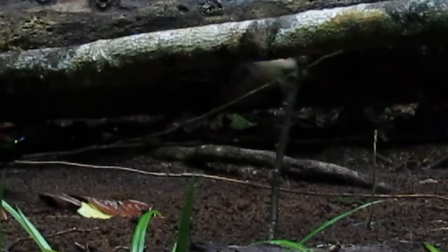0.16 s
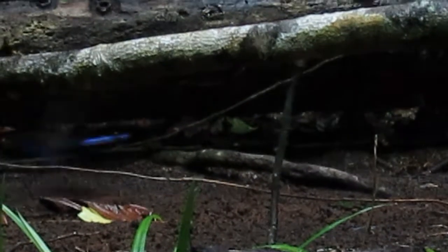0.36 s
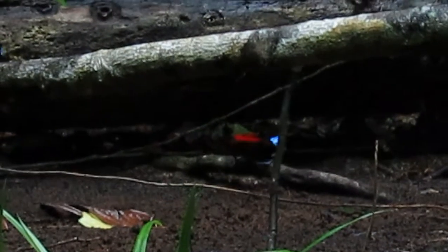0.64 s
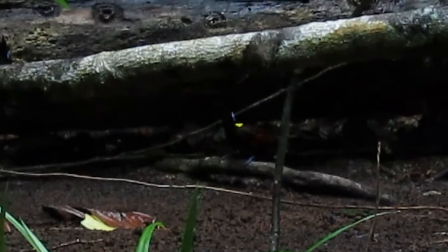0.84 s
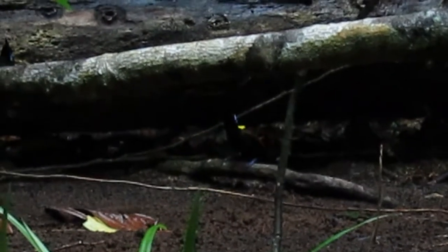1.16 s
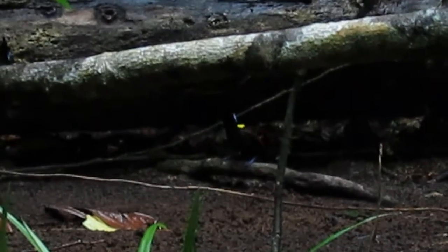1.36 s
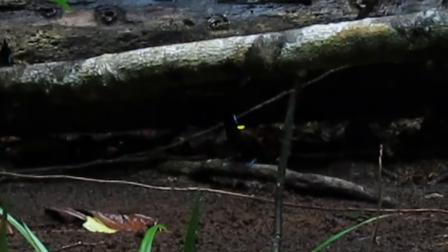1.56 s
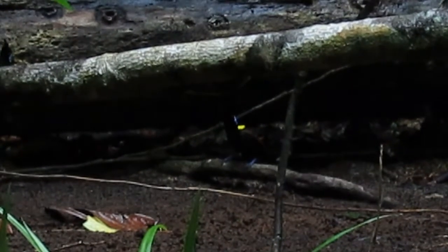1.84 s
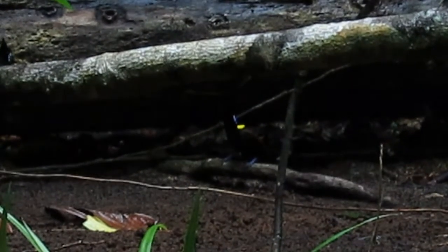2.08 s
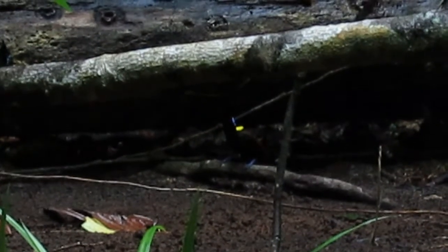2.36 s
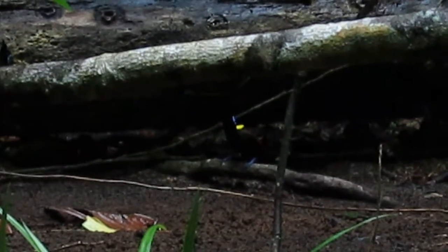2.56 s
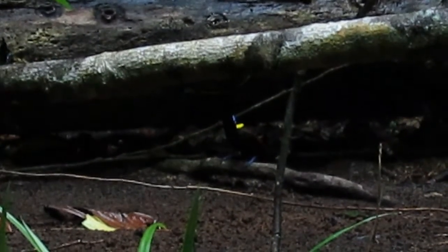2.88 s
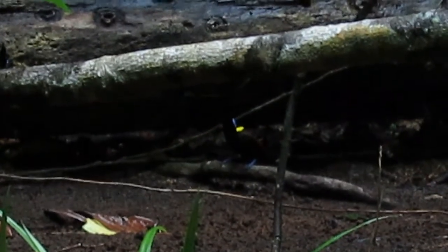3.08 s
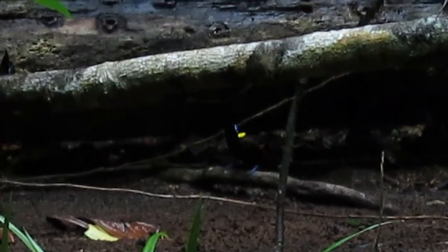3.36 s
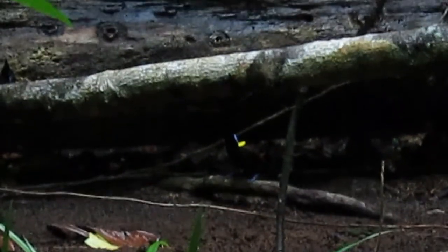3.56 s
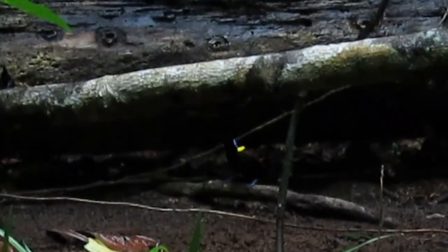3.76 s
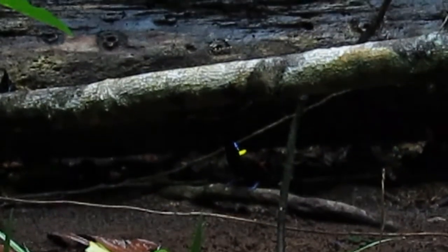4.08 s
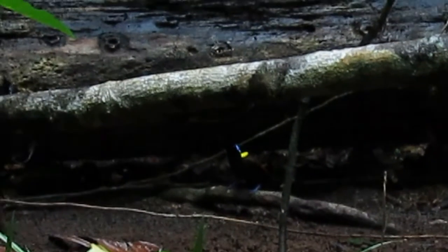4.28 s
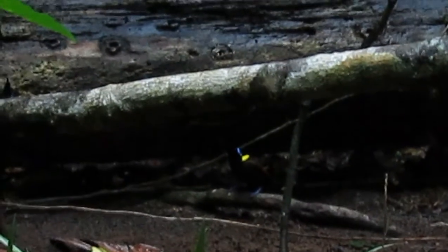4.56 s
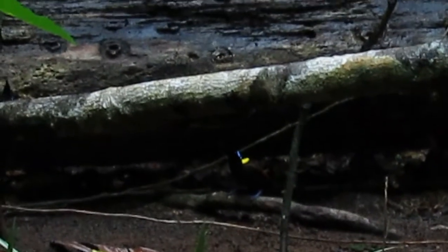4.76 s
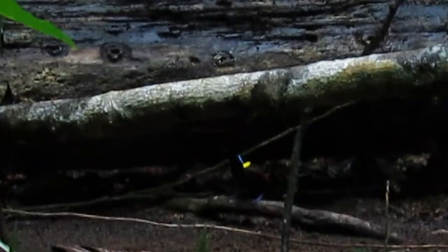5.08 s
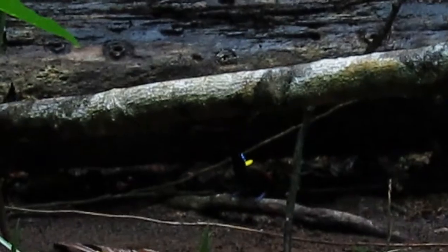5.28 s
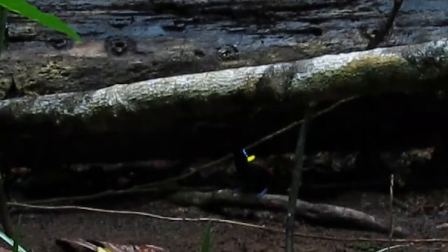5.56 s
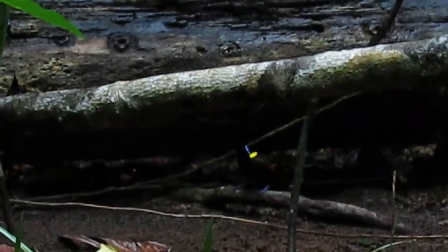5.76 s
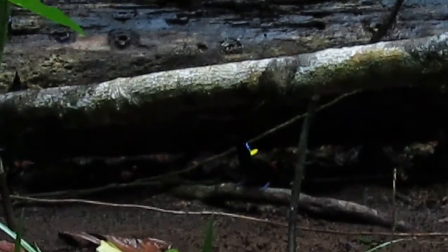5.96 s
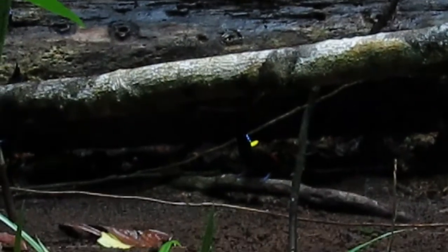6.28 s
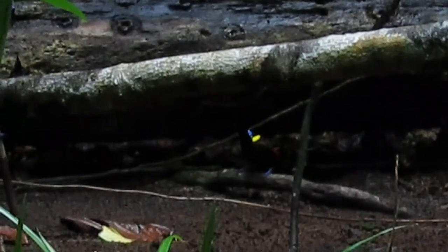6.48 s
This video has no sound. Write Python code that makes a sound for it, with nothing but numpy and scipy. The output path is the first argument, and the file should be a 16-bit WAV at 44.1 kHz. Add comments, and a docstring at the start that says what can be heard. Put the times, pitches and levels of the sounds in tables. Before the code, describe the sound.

A near cricket chirps high pure tones in uneven bursts over a steady insect chorus while a distant bird's falling whistles quicken into a trill.

```python
"""A near cricket chirps pure tones in uneven bursts on a rainforest floor, heard by a stereo pair of microphones.
A fainter cricket sings behind it, and a far insect chorus, made of shaped noise, fills the treble.
At middle distance a bird's gliding falling whistles quicken into a rising trill and a second, deeper bird
joins; slurs, whistles, pips and a hoarse call, all gliding tones, come from other birds.
A small bird lands with a rattle of filtered clicks; ticks and rustles of filtered noise lie over a wide air."""
import sys
import numpy as np
from scipy import signal
from scipy.fft import rfft, irfft
from scipy.io import wavfile
from scipy.ndimage import uniform_filter1d

SR = 44100
rng = np.random.default_rng(int(sys.argv[2]) if len(sys.argv) > 2 else 0)


def master(y):
    """Save y as 16-bit WAV."""
    cut = np.clip(np.atleast_2d(y).T, -1, 1)
    pcm = np.round(cut * 32767)  # scale
    wavfile.write(sys.argv[1], SR, pcm.astype(np.int16))


N = 292383
TIME = np.arange(N) / SR
BINS = np.fft.rfftfreq(N, 1 / SR)

# Levels in the tables are relative: a layer's trim_db and its small variations are added to them.
# still air of the forest: [f/Hz, level common to both sides/dB per Hz, level opposed between them/dB per Hz]
AIR_SPECTRUM = [(25.5, -100, -105), (60, -93, -73.5), (133.4, -90, -72), (296, -88.5, -75), (587, -91, -80),
                (1140, -91, -87), (1510, -91, -89), (2190, -100, -102), (3470, -101, -107),
                (6700, -104, -106), (11100, -107, -107), (13580, -113, -113), (15440, -120, -120)]
# the far insect chorus: [f/Hz, level/dB per Hz]
CHORUS_SPECTRUM = [(3600, -118), (4100, -101), (4400, -89), (4700, -83), (5000, -77.5), (5450, -79),
                   (5950, -84.5), (6250, -79.5), (6500, -91), (6800, -85.5), (7150, -85.5), (7450, -104),
                   (8200, -120)]
# swell of the chorus, followed in part by the air: [t/s, level/dB]
CHORUS_SWELL = [(0, 0.5), (.5, -1), (1.2, 1), (2, 0), (3.1, 1.2), (3.7, -0.2), (4.2, 1.5), (5, -0.8),
                (5.8, -1.5), (6.4, -1.5)]
# how long the trees ring: [f/Hz, time to fall by 60 dB/s]
TREE_RING = [(200, 0.27), (1500, 0.82), (3700, 1), (6300, 0.4), (13000, 0.078)]
# wing flutter, dull rustles and soft thumps: [t/s, length/s, centre f/Hz, level/dB]
SOFT_THUMPS = [(0.197, 0.43, 94, -54), (.345, 0.018, 170, -39), (3.204, 0.44, 744, -58.5),
               (3.278, 0.31, 285, -59), (6.215, 0.059, 288, -42.5)]
# ticks of leaves and twigs: [t/s, level/dB, brightness/dB, ring f/Hz, ring level/dB]
LITTER_TICKS = [(.352, -62, -9.5, 2070, 4), (.394, -66.5, 15, 7500, -5), (.437, -62, 9, 8900, 5),
                (.447, -54.5, 3, 7860, 2.5), (.606, -64, -4.5, 5400, 23.5), (0.927, -57, 5, 3420, 4),
                (1.276, -59, -15.5, 760, 13), (1.312, -55.5, -9, 3660, 6.5), (1.44, -57.5, -6, 3300, 5),
                (1.539, -58.5, -6, 800, 0), (1.552, -55.5, -5, 2030, 4), (1.805, -63, 8, 7500, 1),
                (1.916, -52.5, -5.5, 2700, -7), (2.752, -56, -4.5, 3500, 4), (2.78, -54, -2, 3180, 4),
                (3.374, -59.5, -14, 790, 5), (4.81, -57, -8.5, 3000, 4), (5.708, -61, -4, 1730, 15),
                (5.901, -54.5, -4, 8500, -2)]
# falling whistles of distant birds: [t/s, length/s, first f/Hz, level/dB]
FAR_WHISTLES = [(0, 0.28, 1543, -50.5), (.22, 0.4, 1362, -56.5), (0.956, .2, 1397, -54.5),
                (2.457, 0.092, 1480, -50.5), (2.892, 0.085, 1520, -47), (5.262, 0.12, 1575, -55),
                (5.372, 0.11, 1520, -61), (5.523, 0.12, 1557, -59), (5.718, 0.17, 1456, -61),
                (5.849, .38, 1382, -59), (6.293, 0.1, 1575, -58)]
# syllables of a hoarse far call: [t/s, length/s, first f/Hz, last f/Hz, level/dB]
HOARSE_CALL = [(2.97, 0.071, 2080, 2360, -61.5), (4.023, 0.18, 1956, 2380, -59.5),
               (4.056, 0.071, 2500, 3150, -60.5), (4.255, 0.11, 3310, 2376, -61),
               (4.326, 0.2, 2600, 2150, -62)]
# thin high pips: [t/s, first f/Hz, level/dB]
HIGH_PIPS = [(.597, 12400, -64), (2.475, 12600, -58), (4.06, 12100, -62), (5.81, 13300, -59),
             (5.915, 12700, -59), (6.151, 13900, -54)]
# short slurred calls of another bird: [t/s, length/s, first f/Hz, last f/Hz, level/dB]
NEAR_SLURS = [(.07, 0.077, 3450, 3950, -60), (2.825, .05, 3020, 2950, -57.5),
              (2.948, .045, 3540, 3800, -52.5), (3.364, .048, 3590, 3700, -51),
              (3.818, 0.056, 3380, 3830, -54), (3.866, 0.041, 3800, 3560, -56.5)]
# blurred calls from deep among the trees, short high slurs and a few low falling whistles:
# [t/s, length/s, first f/Hz, last f/Hz, level/dB]
DEEP_CALLS = [(0, 0.028, 3580, 3800, -58.5), (0, 0.068, 2955, 3530, -61), (.075, 0.048, 3420, 4060, -57),
              (2.99, 0.055, 3680, 4370, -53.5), (3.09, 0.073, 1400, 1186, -58), (3.64, .1, 1380, 1120, -57),
              (3.87, 0.05, 3620, 4400, -57), (4.33, 0.15, 2573, 2524, -66),
              (5.26, 0.101, 1650, 1398, -61.5)]
# the second bird's farther trill: [t/s, top f/Hz, level/dB]
ANSWER_COURSE = [(1.8, 1522, -51.5), (2.5, 1545, -68), (3.05, 1642, -60.5), (3.8, 1843, -55.5),
                 (4.55, 1863, -56.5), (4.9, 1768, -89)]
# course of the first bird's song; linger above 1 holds each note high longer:
# [t/s, top f/Hz, bottom f/Hz, level/dB, linger (exponent), scatter level/dB]
SONG_COURSE = [(.74, 1682, 1392, -51.5, 0.86, -5), (1.01, 1671, 1420, -49.5, 0.78, -5.5),
               (1.3, 1725, 1405, -51, 0.7, -4), (1.5, 1798, 1421, -48.5, 0.82, -5.5),
               (2.1, 1851, 1426, -51, 1.21, -2.5), (2.55, 1970, 1390, -50, 1.27, -2),
               (3.05, 2002, 1407, -47, 1.29, -2), (3.6, 1971, 1428, -51, 1.295, -4),
               (3.8, 1967, 1464, -59.5, 1.25, -1.5)]
# twig rattle as the small bird lands: [t/s, level/dB]
LANDING_KNOCKS = [(0.9274, -25), (.9308, -28.5), (0.9331, -38.5), (0.934, -39), (0.9408, -33.5)]
# the second, fainter cricket: [t/s, level/dB]
FAR_CRICKET_CHIRPS = [(.23, -45.5), (.75, -52.5), (.82, -52), (1.39, -44), (1.45, -44), (2.06, -47),
                      (2.745, -41), (2.825, -44), (3.1, -43), (3.27, -41.5), (4.19, -43), (4.28, -40),
                      (4.355, -39.5), (4.98, -50.5), (5.3, -44.5), (5.55, -46)]
# the near cricket: [t/s, level/dB, echo level/dB]
NEAR_CRICKET_CHIRPS = [(0.111, -33.0, -0.5), (0.171, -32.5, -8), (0.2715, -33, 0), (0.335, -37.5, -5),
                       (0.3985, -30, -11), (1.1924, -31, -3.5), (1.2425, -33.5, -1), (1.3265, -28.5, -5),
                       (1.4985, -36.0, -10), (1.9365, -30.5, -7), (2.1105, -32.0, -9.5), (2.1754, -31, -6),
                       (2.2745, -31.0, -5.5), (2.3385, -36.5, -11), (2.404, -31.0, -8.5),
                       (2.909, -31, -4.5), (2.99, -30, -8.5), (3.05, -29.5, -5), (3.1354, -27.5, -7),
                       (3.2235, -34.5, -6), (3.3044, -26.5, -10), (3.802, -31.0, -3.5), (3.8584, -30, -9.5),
                       (4.0594, -30, -1), (4.1224, -28.5, -6), (4.2244, -31, -9), (4.312, -39, -18),
                       (4.3854, -30, -7), (4.859, -30.5, -9), (4.9114, -30, -12), (5.3404, -32.0, -3),
                       (5.4144, -30.5, -2), (5.5084, -30, -6), (5.6055, -32.5, -9), (5.685, -41, -7),
                       (6.1954, -30.5, -6.5), (6.2454, -31, -7), (6.3684, -33.5, -7)]
# the two overlapping arches that shape every near chirp: [delay/s, length/s, level/dB]
CHIRP_SHAPE = [(.0005, 0.0106, -4), (.0075, 0.0205, 0)]

WHISTLE_GLIDE, PIP_GLIDE = 0.85, 0.95  # last pitch as a ratio of the first
PIP_S = 0.075
ANSWER_NOTES_PER_S = 14.5
# a long pause between notes shrinks quickly; the bird then tires a little with each note
TRILL_START_S, NOTE_COUNT = 0.741, 38
BASE_GAP_S, PAUSE_S, PAUSE_HALVED_NOTES, TIRING_S_PER_NOTE = 0.0252, 0.2435, 2.1, 0.00069
NOTE_BASE_S, NOTE_SHARE = 0.01277, 0.47  # a note lasts this long plus a share of the gap to the next
# every chirp starts a little flat and settles around the pitch of the wings
WING_HZ, FLAT_HZ, SETTLE_S = 6266, 120, 0.004
# an echo with its own phase follows each near chirp, its delay varying a little
ECHO_S, ECHO_JITTER_S, ECHO_LENGTH_S = 0.026, 0.004, 0.025
END_S, EDGE_HZ = 6.48, 15800


def amp(db):
    """Amplitude ratio of a level in dB."""
    return 10 ** (np.asarray(db) / 20)


def unit(x):
    """Scale to an RMS of one."""
    return x / np.sqrt(np.mean(x ** 2) + 1e-20)


def along(rows, at):
    """The columns of a curve at the given times."""
    s, *columns = np.transpose(rows)
    return [np.interp(at, s, column) for column in columns]


def across(rows, hz):
    """The columns of a spectrum at the given frequencies, on a logarithmic scale."""
    f, *columns = np.transpose(rows)
    return [np.interp(np.log(hz + 1), np.log(f), column) for column in columns]


def add(mix, s, sound):
    """Lay a sound into the mix from a time in seconds."""
    part = mix[max(round(s * SR), 0):][:len(sound)]
    part += sound[:len(part)]


def hiss(db):
    """Noise with the given level per Hz in each bin."""
    return irfft(rfft(rng.standard_normal(N)) * amp(db), N) * np.sqrt(SR / 2)


def drift(hz):
    """Smooth random motion of RMS one, 10 dB down at hz and falling steeply above."""
    return unit(hiss(-10 * np.minimum((BINS / hz) ** 2, 20)))


def band(x, low_hz, high_hz, order=2):
    """Band-pass a sound."""
    sos = signal.butter(order, [low_hz, min(high_hz, SR / 2 - 1)], "band", fs=SR, output="sos")
    return signal.sosfilt(sos, x)


def place(x, lag_ms=0.014, left_db=0.57):
    """Sound from almost straight ahead: the left side comes a trace late, with a small level offset."""
    late = irfft(rfft(x) * np.exp(-2j * np.pi * BINS * lag_ms * 1e-3), N)
    return np.array([late * amp(left_db), x * amp(-left_db)])


def forest(x, wet_db, spread):
    """Distance: direct sound plus scatter from trunks and leaves, sparse echoes that decay by frequency."""
    echoes_per_s = 2000
    taps = rng.standard_normal((2, SR)) * (rng.random((2, SR)) < echoes_per_s / SR)
    hz, t, z = signal.stft(taps, SR, nperseg=256)
    decay = amp(-60 * t / across(TREE_RING, hz)[0][:, None])
    onset = 1 - np.exp(-t / 0.0095)
    tails = signal.istft(z * decay * onset, SR, nperseg=256)[1]
    mid, side = (signal.fftconvolve(x, tail / np.linalg.norm(tail))[:N] for tail in tails)
    return place(x + amp(wet_db) * mid) + amp(wet_db) * spread * np.array([side, -side])


def whistle(length, first_hz, last_hz, edge, quaver=0, hook=0, hook_s=0.0034, linger=1):
    """A gliding sine with soft ends; quaver unsteadies the pitch and a hook flicks it up from below."""
    t = np.arange(int(length * SR)) / SR
    glide = first_hz * (last_hz / first_hz) ** ((t / length) ** linger)
    hooked = glide * (1 - hook * np.exp(-t / hook_s))
    unsteady = unit(uniform_filter1d(rng.standard_normal(len(t)), size=200))
    hz = hooked * (1 + quaver * unsteady)
    return np.sin(2 * np.pi * np.cumsum(hz) / SR) * signal.windows.tukey(len(t), edge)


def air(waver_db=1.29, treble_waver_db=1.68, split_hz=1500, follow=0.6):
    """A dull noise wash, very wide in the bass, wavering below and above a split, that follows the swell."""
    mid, side = (hiss(db) for db in across(AIR_SPECTRUM, BINS))
    swell, = along(CHORUS_SWELL, TIME)
    wash = np.array([mid + side, mid - side]) * amp(follow * swell)
    bass = irfft(rfft(wash) / (1 + (BINS / split_hz) ** 4), N)
    treble = wash - bass
    return bass * amp(waver_db * drift(24)) + treble * amp(treble_waver_db * drift(22))


def chorus(trim_db=0, throb_db=0.76, buzz_db=0.13, spread=0.32):
    """Countless far insects merge into a noise band that throbs slowly and buzzes faster, a little."""
    colour, = across(CHORUS_SPECTRUM, BINS)
    swell, = along(CHORUS_SWELL, TIME)
    mid = hiss(colour) * amp(throb_db * drift(38) + buzz_db * drift(250))
    side = spread * hiss(colour)
    return (place(mid, lag_ms=0.016, left_db=-0.1) + np.array([side, -side])) * amp(trim_db + swell)


def thumps(common=0.11, together_hz=900):
    """Soft puffs and rustles of band noise; the lowest are mostly opposed between the two sides."""
    out = np.zeros((2, N))
    for s, length, hz, db in SOFT_THUMPS:
        puff = unit(band(rng.standard_normal((2, int(length * SR))), hz / 1.24, hz * 1.38))
        mid, side = amp(db) * puff * np.hanning(puff.shape[1])
        mid = mid * np.hypot(common, hz / together_hz)
        add(out[0], s, mid + side)
        add(out[1], s, mid - side)
    return out


def litter(thud_s=0.0065, snap_s=0.0057, crisp_s=0.0023, ring_s=0.0054, snap_db=1.0,
           faint_per_s=14, faint_db=-49):
    """Ticks of decaying noise and a short ring, dull for a twig, bright for a leaf; faint ones at random."""
    out, t = np.zeros(N), np.arange(3000) / SR
    for s, db, bright_db, ring_hz, ring_db in LITTER_TICKS:
        thud, snap, crisp = rng.standard_normal((3, len(t)))
        add(out, s, amp(db - bright_db) * unit(band(thud, 180, 1290)) * np.exp(-t / thud_s))
        add(out, s, amp(db + snap_db) * unit(band(snap, 1600, 5500)) * np.exp(-t / snap_s))
        add(out, s, amp(db + bright_db) * unit(band(crisp, 6000, 13000)) * np.exp(-t / crisp_s))
        add(out, s, amp(db + ring_db) * np.sin(2 * np.pi * ring_hz * t) * np.exp(-t / ring_s))
    faint = amp(faint_db) * rng.standard_normal(N) * (rng.random(N) < faint_per_s / SR)
    return forest(out + band(faint, 500, 13000, order=1), wet_db=-17, spread=0.54)


def pips(trim_db=-7, quaver=0.02):
    """Thin, unsteady high gliding tones, blurred by the leaves."""
    out = np.zeros(N)
    for s, hz, db in HIGH_PIPS:
        pip = whistle(PIP_S, hz, hz * PIP_GLIDE, edge=0.4, quaver=quaver)
        add(out, s, amp(trim_db + db) * pip)
    return forest(out, wet_db=9.5, spread=0.45)


def far_birds(whistle_trim_db=-3.5, rasp_trim_db=-1, rasp_width_hz=420, haze=0.32, haze_hz=70, fade_db=5):
    """Distant falling whistles, fading and hazy, and a call made hoarse by noise modulation."""
    clear, rough = np.zeros(N), np.zeros(N)
    hoarse = drift(rasp_width_hz)
    for s, length, hz, db in FAR_WHISTLES:
        note = whistle(length, hz, hz * WHISTLE_GLIDE, edge=0.06, quaver=0.013)
        fade = np.linspace(0, fade_db, len(note))
        add(clear, s, amp(whistle_trim_db + db - fade) * note)
    for s, length, first_hz, last_hz, db in HOARSE_CALL:
        add(rough, s, amp(rasp_trim_db + db) * whistle(length, first_hz, last_hz, edge=0.42))
    clear *= 1 + haze * drift(haze_hz)
    return forest(clear, wet_db=-2.5, spread=0.6) + forest(rough * hoarse, wet_db=-4, spread=0.7)


def gliding_calls(rows):
    """Short gliding calls with a slightly unsteady pitch."""
    out = np.zeros(N)
    for s, length, first_hz, last_hz, db in rows:
        add(out, s, amp(db) * whistle(length, first_hz, last_hz, edge=0.47, quaver=0.007))
    return out


def calling_birds(near_trim_db=-1, deep_trim_db=-5, blur_hz=190):
    """Near slurs arrive a little grainy with a faint tail; deep calls are blurred and mostly scatter."""
    grain = 0.95 + 0.28 * drift(160)
    near = forest(gliding_calls(NEAR_SLURS) * grain, wet_db=-10, spread=0.7)
    deep = forest(gliding_calls(DEEP_CALLS) * drift(blur_hz), wet_db=5, spread=0.6)
    return amp(near_trim_db) * near + amp(deep_trim_db) * deep


def answer(fall=0.85, length=0.0493, trim_db=-5):
    """The second bird repeats a like falling note at a steady rate, deeper among the trees."""
    out = np.zeros(N)
    for s in np.arange(ANSWER_COURSE[0][0], ANSWER_COURSE[-1][0], 1 / ANSWER_NOTES_PER_S):
        hz, db = along(ANSWER_COURSE, s)
        top_hz = hz * (1 + 0.0074 * rng.standard_normal())
        add(out, s, amp(trim_db + db) * whistle(length, top_hz, hz * fall, edge=0.52))
    return forest(out, wet_db=0, spread=0.6)


def trill(trim_db=1.8, uneven_pitch=0.0047, accent_db=1, fade_db=3.5):
    """Notes flick up and slide down, quickening and shortening at first, then slowing very slightly."""
    out, s = np.zeros(N), TRILL_START_S
    for k, (sharp, accent) in enumerate(rng.standard_normal((NOTE_COUNT, 2))):
        gap = BASE_GAP_S + PAUSE_S / (1 + k / PAUSE_HALVED_NOTES) + TIRING_S_PER_NOTE * k
        top_hz, bottom_hz, db, linger, _ = along(SONG_COURSE, s)
        note = whistle(NOTE_BASE_S + NOTE_SHARE * gap, top_hz * (1 + uneven_pitch * sharp), bottom_hz,
                       edge=0.18, quaver=0.006, hook=0.17, hook_s=0.03 * gap, linger=linger)
        fade = np.linspace(0, fade_db, len(note))
        add(out, s, amp(trim_db + db + accent_db * accent - fade) * note)
        s += gap
    return forest(out, wet_db=along(SONG_COURSE, TIME)[-1], spread=0.7)


def landing(trim_db=0, wide=0.4, low_hz=200, high_hz=1320):
    """A small bird lands on a twig: dull filtered clicks in quick succession, with hardly any ring."""
    click = band(signal.unit_impulse(900), 60, high_hz, order=6)
    knock = band(click, low_hz, 4000, order=2)
    knock = knock / abs(knock).max()
    mid, side = np.zeros(N), np.zeros(N)
    for s, db in LANDING_KNOCKS:
        add(mid, s, -amp(trim_db + db) * knock)
        add(side, s + 0.00119, wide * amp(trim_db + db) * knock)
    return forest(mid, wet_db=-21.5, spread=0.96) + np.array([side, -side])


def far_cricket(trim_db=-1, hz=6350, length=0.035, scatter_hz=30):
    """A second, fainter cricket sings near-pure tones a little higher, often between the near chirps."""
    out = np.zeros(N)
    for (s, db), sharp in zip(FAR_CRICKET_CHIRPS, rng.standard_normal(len(FAR_CRICKET_CHIRPS))):
        pitch = hz + scatter_hz * sharp
        add(out, s, amp(trim_db + db) * whistle(length, pitch, pitch, edge=0.57, quaver=0.005))
    return forest(out, wet_db=-4, spread=0.7)


def arch(t, delay, length):
    """A half-sine rise and fall of level."""
    return np.sin(np.pi * np.clip((t - delay) / length, 0, 1))


def cricket(trim_db=1.0, octave_db=-32, octave_s=0.018, wobble_hz=20, scatter_hz=9,
            flutter_db=0.86, uneven_db=1, slip_rad=0.9):
    """Each near chirp is one almost pure tone, its octave fading fast; an echo with its own phase follows."""
    out, t = np.zeros(N), np.arange(3000) / SR
    first, main = (amp(db) * arch(t, delay, length) for delay, length, db in CHIRP_SHAPE)
    wobble = wobble_hz * drift(130)
    chances = rng.standard_normal((len(NEAR_CRICKET_CHIRPS), 5))
    for (s, db, echo_db), (sharp, force, slip, late, turn) in zip(NEAR_CRICKET_CHIRPS, chances):
        settling = FLAT_HZ * np.exp(-t / SETTLE_S)
        pitch = WING_HZ + scatter_hz * sharp - settling + wobble[int(s * SR):][:len(t)]
        angle = 2 * np.pi * np.cumsum(pitch) / SR
        opening = amp(uneven_db * force) * first * np.sin(angle + slip_rad * slip)
        tone = opening + main * np.sin(angle)
        echo_shape = arch(t, ECHO_S + ECHO_JITTER_S * late, ECHO_LENGTH_S)
        echo = amp(echo_db) * echo_shape * np.sin(angle + np.pi + turn)
        octave = amp(octave_db) * np.sqrt(first + main) * np.exp(-t / octave_s) * np.sin(2 * angle)
        add(out, s, amp(trim_db + db) * (tone + echo + octave))
    heard = forest(out * amp(flutter_db * drift(120)), wet_db=-13, spread=0.7)
    return heard * amp([[0.5], [-0.5]])  # a little to the left


def scene():
    """Sum all layers, from the background to the near cricket."""
    background = air() + chorus() + thumps() + litter()
    birds = pips() + far_birds() + calling_birds() + answer() + trill() + landing()
    return background + birds + far_cricket() + cricket()


def record(dry):
    """The sound fades out in 5 ms just before the end, then a low-pass limits the band."""
    running = np.clip((END_S - TIME) * 200, 0, 1)
    low_pass = signal.firwin(511, EDGE_HZ, window=("kaiser", 9), fs=SR)
    return signal.oaconvolve(dry * running, low_pass[None], "same", axes=1)


dry = scene()
out = record(dry)
master(out)
```